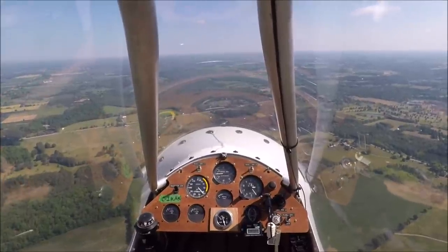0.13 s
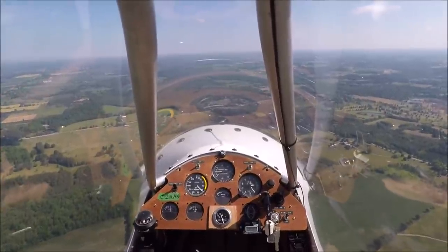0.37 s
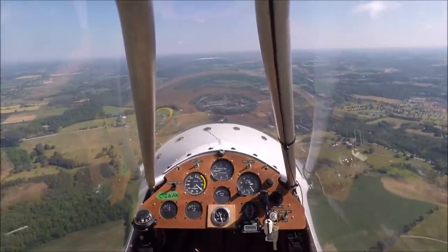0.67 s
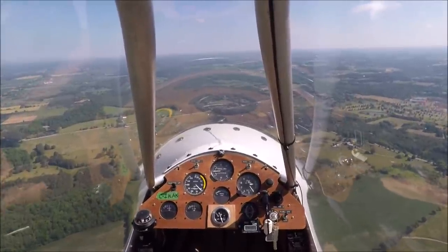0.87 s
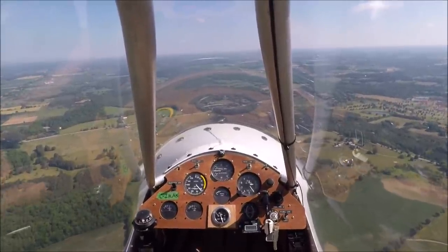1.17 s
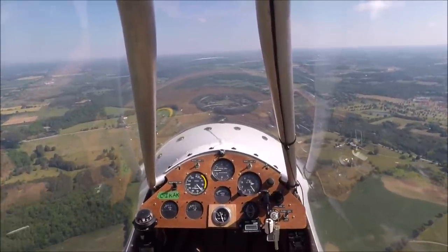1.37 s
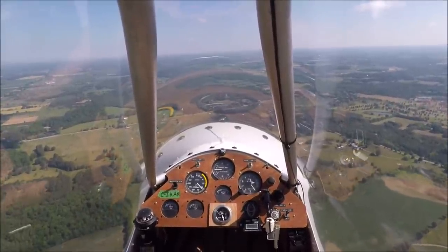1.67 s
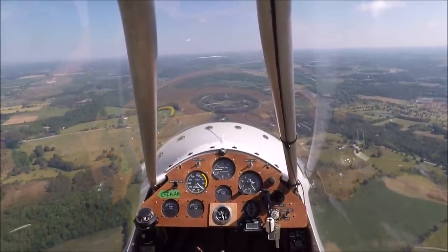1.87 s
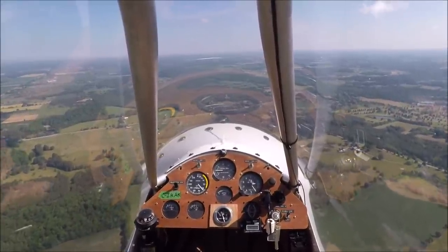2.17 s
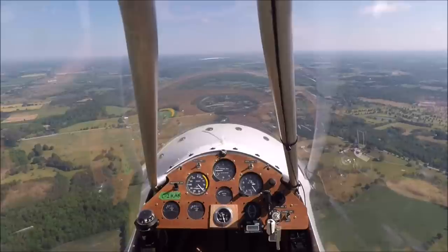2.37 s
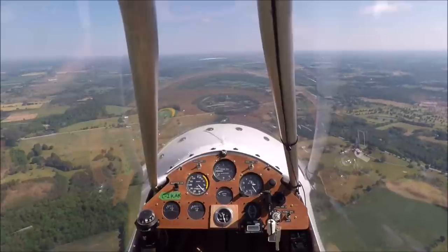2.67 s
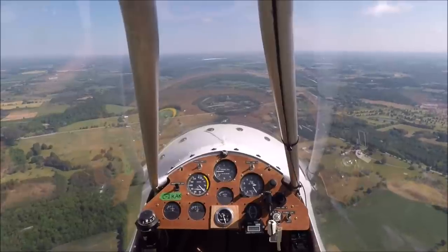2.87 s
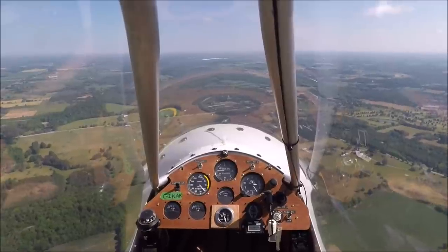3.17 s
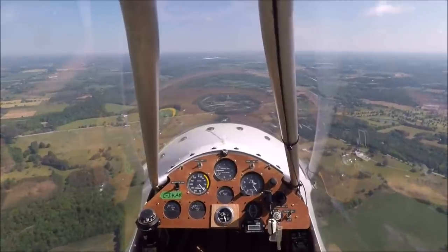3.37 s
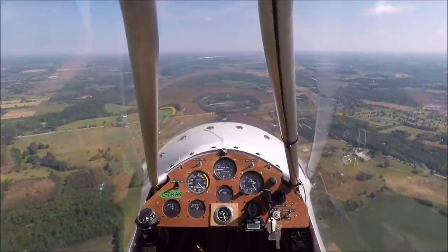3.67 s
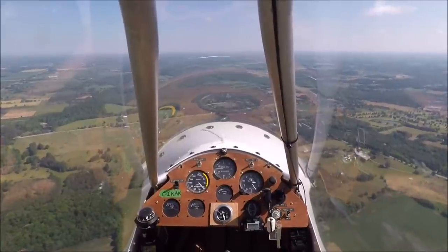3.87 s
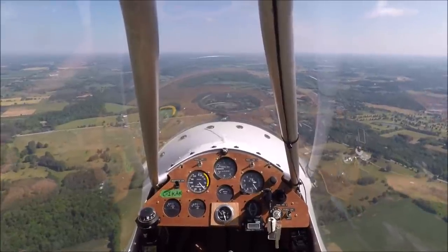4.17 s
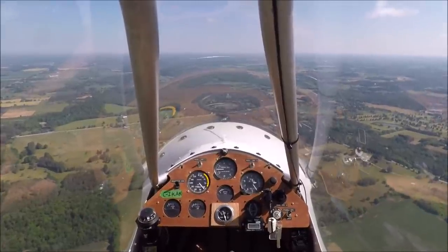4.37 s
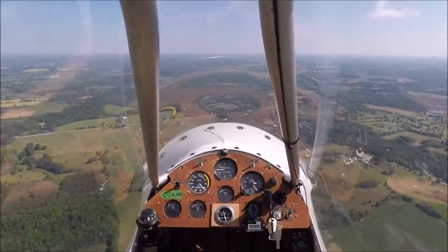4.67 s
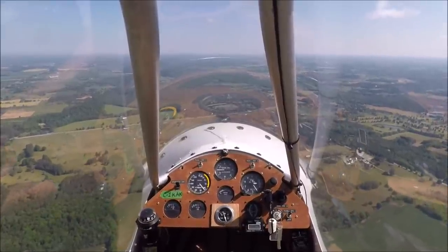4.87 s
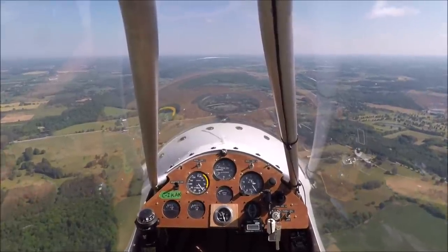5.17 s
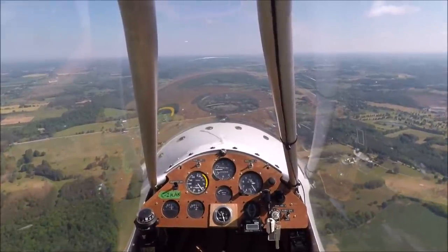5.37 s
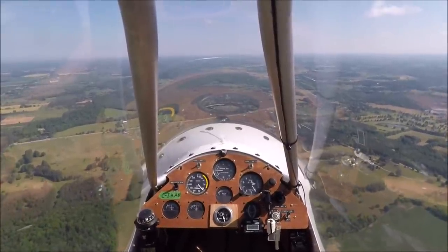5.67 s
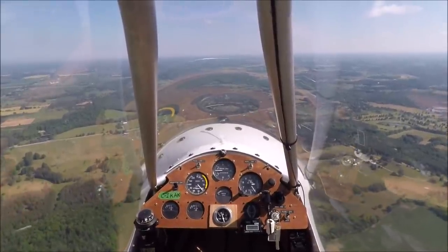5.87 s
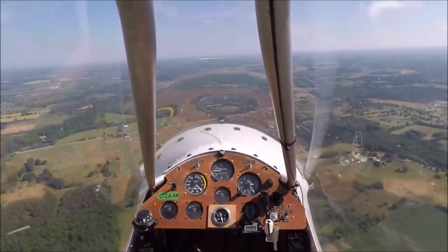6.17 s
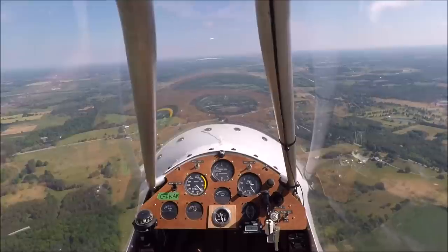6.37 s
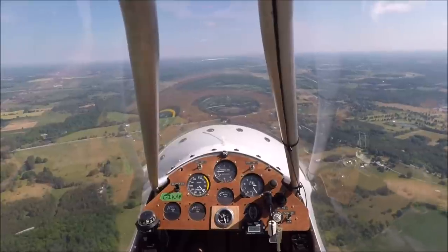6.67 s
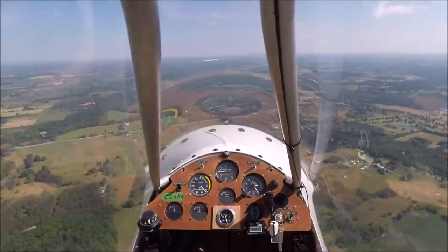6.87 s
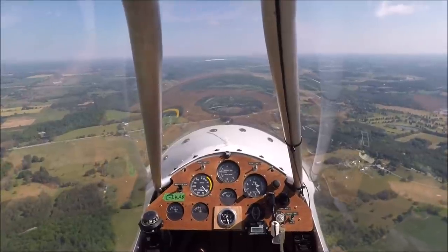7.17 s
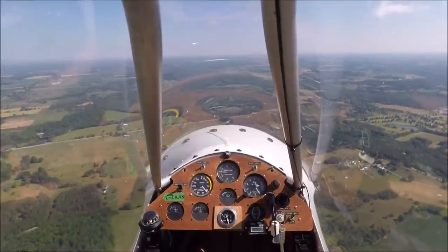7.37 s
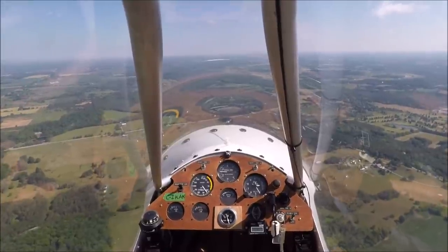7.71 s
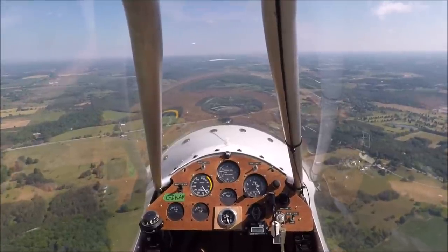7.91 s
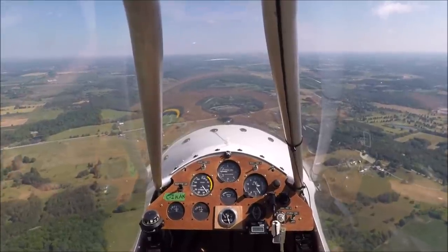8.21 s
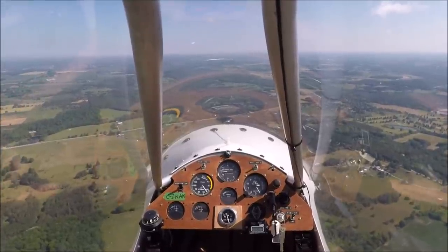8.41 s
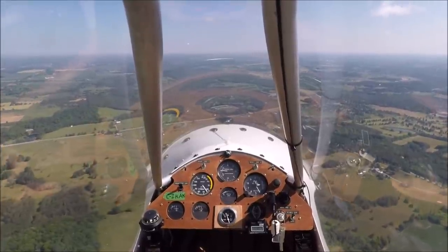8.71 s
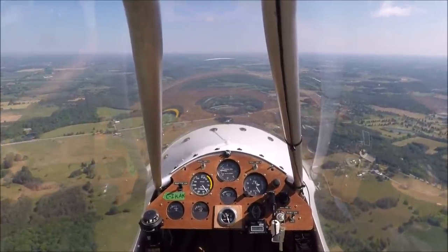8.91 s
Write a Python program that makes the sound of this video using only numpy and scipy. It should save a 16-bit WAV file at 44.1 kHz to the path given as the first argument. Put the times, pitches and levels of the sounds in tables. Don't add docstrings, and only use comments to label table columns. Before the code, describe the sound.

From 0 to about 9 seconds, a light aircraft's idle intercom line drones without a break. The main sound is a nasal, buzzing alternator whine around 565 to 570 hertz with bright overtones, dipping slightly near 0.4 seconds, then creeping up and wavering by tiny amounts. Soft, dull thumps run through it about 24 per second, nearly regular with occasional small slips, giving a fast puttering flutter. Beneath is thin, band-limited engine and propeller noise from a headset microphone, roughly 1 to 6 kilohertz, grainy and unsteady. Brief gusts lift it slightly near 1, 3, 4.6, 6.4 and 8.5 seconds; it eases around 5.8, then grows closer and rougher from about 7.7. Everything is dry and left-sided. The right side carries only faint hiss and a very weak low hum. Nobody speaks, and it ends still droning.

```python
import sys
import numpy as np
from scipy import signal
from scipy.fft import rfft, irfft, next_fast_len
from scipy.io import wavfile

SR = 44100
rng = np.random.default_rng(int(sys.argv[2]) if len(sys.argv) > 2 else 0)


def makeup_ratio(level_db):
    decades = np.asarray(level_db, float) / 20
    return 10 ** decades


def unload_wav(signal):
    wavfile.write(
        sys.argv[1],
        SR,
        np.round(np.clip(np.atleast_2d(signal).T, -1, 1) * 32767).astype(np.int16),
    )


N = 399105


def drift(rate_hz, count=1):
    step = max(int(SR / rate_hz / 8), 1)
    pole = np.exp(-2 * np.pi * rate_hz * step / SR)
    noise = rng.standard_normal((count, N // step + 52))
    slow = signal.lfilter([1], [1, -2 * pole, pole * pole], noise)[:, 50:]
    return np.array([np.interp(np.arange(N) / step, np.arange(len(s)), s / s.std()) for s in slow])


def coloured(hz_points, db_points, edges_hz=(0, SR)):
    size = next_fast_len(N, True)
    hz = np.arange(size // 2 + 1) * SR / size
    density_db = np.interp(np.log(hz + 1), np.log(hz_points), db_points)
    spectrum = rfft(rng.standard_normal(size)) * makeup_ratio(density_db) * np.sqrt(SR / 2)
    if len(edges_hz) == 2:
        return irfft(spectrum, size)[:N]
    shares = [np.interp(hz, edges_hz, share) for share in np.eye(len(edges_hz))]
    return np.array([irfft(spectrum * share, size)[:N] for share in shares])


def wave(turns):
    return np.cos((2 * np.pi * (turns - np.floor(turns))).astype(np.float32))


def wandering(turning, lines, steady, wander_hz):
    wander = drift(wander_hz, count=2 * len(lines)) * np.sqrt((1 - steady ** 2) / 2)
    out = np.zeros(N)
    for k, (multiple, peak_db) in enumerate(lines):
        turns = round(multiple) * turning + rng.random()
        in_phase = (steady + wander[2 * k]) * wave(turns)
        quadrature = wander[2 * k + 1] * wave(turns - 1 / 4)
        out += makeup_ratio(peak_db) * (in_phase + quadrature)
    return out


# start_s [s], rate_hz [Hz]
SPEED = [(0.0, 564.779), (0.401, 562.858), (0.532, 564.41), (1.5, 567.418), (2.005, 566.788),
         (2.08, 567.85), (2.147, 569.385), (3.952, 567.539), (4.191, 569.865), (5.274, 570.337),
         (5.336, 568.944), (5.984, 569.034), (6.435, 567.742), (6.998, 567.823), (7.412, 567.099),
         (7.606, 568.781), (8.354, 570.025), (9.05, 569.419)]


def ripple_cycles(t):
    return 0.449 + np.cumsum(np.interp(t, *np.transpose(SPEED))) / SR


# freq_hz [Hz], left_db [dB per Hz], right_db [dB per Hz]
HISS = [
    (11.8, -79, -84),
    (39, -94, -99),
    (142, -95.5, -100.5),
    (385, -93.5, -103.5),
    (1020, -102, -107),
    (2900, -108, -110),
    (5200, -113.5, -113.5),
    (9100, -118, -116.5),
    (9800, -116, -114),
    (14800, -118, -117),
]


def amplifier_hiss():
    hz, left_db, right_db = np.transpose(HISS)
    return np.array([coloured(hz, left_db), coloured(hz, right_db)])


def ground_hum(cycles):
    return makeup_ratio(-87) * wave(cycles / 3)


# [closeness to the noise, dB]
HEAD = [(0.0, -0.33, -0.59, 0.5), (0.4, -0.32, 0.066, 0), (0.87, 0.71, -1.7, -1), (1.4, 0.8, -0.92, 0.4),
        (2.0, 0.88, 0.13, 0), (2.4, 0.4, -0.13, 0.01), (2.91, 1, -0.28, -0.4), (3.5, 0.67, 0.19, -1.5),
        (4.1, 0.7, 0.14, 0.8), (4.6, 0.34, 1.49, 0.3), (5.2, -0.13, 1.6, 1.3), (5.8, -0.19, 0.71, -3),
        (6.3, 0.25, -0.7, -0.2), (6.9, 0.17, -0.45, -0.5), (7.45, 0.47, -0.96, 1),
        (7.7, -1.8, -0.0032, 3.1), (8.39, -0.93, 0.5, 1.15), (9.05, -1.2, 0.78, 2.6)]


def echoed(lines, ripple_share):
    s, canopy_cm, panel_cm, _ = np.transpose(HEAD)
    t = np.arange(N) / SR
    paths_cm = {"canopy": np.interp(t, s, canopy_cm), "panel": np.interp(t, s, panel_cm)}
    sound_cm_per_s = 34300
    waves_per_cm = np.mean(np.array(SPEED)[:, 1]) * ripple_share / sound_cm_per_s
    out = []
    for multiple, direct_db, echo, agree_cm, wall in lines:
        turns = round(multiple) * waves_per_cm * (paths_cm[wall] - agree_cm)
        power = 1 + echo ** 2 + 2 * echo * wave(turns)
        out.append((multiple, direct_db + 10 * np.log10(power)))
    return out


# start_s [middle of the gust, s], level_db [rise, dB], length_s [s]
GUSTS = [(1.01, 4, .05), (2.522, 2, .06), (2.77, 2, .05), (2.97, 5, 0.17), (3.172, 5, 0.055),
         (3.74, 2.5, .06), (4.58, 3, .08), (4.878, 2, 0.11), (5.334, 1, .15), (6.396, 5, .05),
         (8.11, 2, .05), (8.38, 3.5, 0.036), (8.53, 4, .07)]


def slipstream(t):
    s, *_, near_db = np.transpose(HEAD)
    gusts_db = sum(db * np.exp(-(2 * (t - at) / length) ** 2) for at, db, length in GUSTS)
    flutter_db = 0.5 * drift(rate_hz=9)[0]
    return makeup_ratio(np.interp(t, s, near_db) + gusts_db + flutter_db)


# freq_hz [Hz], level_db [dB per Hz]
LEAK_COLOUR = [(400, -106), (850, -100), (1050, -93), (1220, -80), (1350, -87), (1500, -85), (1850, -90.5),
               (2700, -92.5), (3200, -90), (4300, -95.5), (5900, -94), (7500, -102), (10500, -109),
               (12500, -122)]


def engine_noise(patchy_db=1.0, shared_db=1.06):
    bands = coloured(*np.transpose(LEAK_COLOUR), edges_hz=(600, 1200, 1800, 2800, 4200, 6000, 9000))
    patches = patchy_db * drift(rate_hz=4, count=len(bands))
    return np.sum(bands * makeup_ratio(patches + shared_db * drift(rate_hz=19)), axis=0)


# multiple [of the blade rate], level_db [peak dB]
BLADE_LINES = [(1, -73), (2, -68.5), (3, -80), (5, -90), (9, -72), (10, -78), (11, -73), (12, -71),
               (14, -67.5), (15, -65), (16, -63.5), (17, -62), (18, -70), (19, -77), (20, -62), (21, -62.5),
               (22, -71), (23, -89), (24, -68.5), (25, -72), (27, -71), (28, -69), (29, -77), (30, -68.5),
               (31, -69.5)]


def propeller(cycles):
    turning = cycles * 5 / 39
    airframe = wandering(turning, BLADE_LINES[:3], steady=0.96, wander_hz=4)
    return airframe + wandering(turning, BLADE_LINES[3:], steady=0.76, wander_hz=4)


# multiple [of a sixth of the ripple rate], level_db [peak dB]
ORDER_LINES = [(9, -77), (10, -70), (17, -68), (20, -71), (22, -76), (23, -68), (26, -66), (27, -69),
               (28, -70), (32, -66.5), (35, -70.5), (44, -72), (46, -71), (49, -76), (50, -73), (52, -68.5),
               (56, -65.5), (59, -81), (61, -73), (68, -73), (70, -72.5), (76, -75), (80, -73.5)]
# multiple [of a sixth of the ripple rate], level_db [direct peak dB],
# echo_share [0-1], agree_cm [extra path where both agree, cm], wall [name]
ORDERS_ECHOED = [
    (15, -55.5, 0.9, -10.5, "canopy"),
    (21, -54, 0.87, 8.5, "canopy"),
    (34, -55, 0.71, 5, "canopy"),
    (62, -60, 0.87, -2.5, "canopy"),
    (58, -69, .97, 1.3, "panel"),
    (63.53, -67.5, .97, -0.3, "panel"),
]


def engine_orders(cycles, jitter=0.0019):
    turning = (cycles + jitter * drift(rate_hz=50)[0]) / 6
    loose = wandering(turning, ORDER_LINES, steady=0.82, wander_hz=3)
    return loose + wandering(turning, echoed(ORDERS_ECHOED, ripple_share=1 / 6), steady=0.96, wander_hz=12)


EARLY_THUMPS = [17, 33, 36, 38, 40, 44, 45, 46, 47, 49, 155, 157, 169, 170, 171, 176]


def thumps(cycles, click_db=-5.5, low_cut_hz=35, sag_hz=70, sag_width_hz=35, sag=0.57):
    first_cycles, every_cycles = 17.45, 24
    dull_hz, smear_hz, damping, vary_db = 1000, 261, 1.2, 0.6
    gaps = np.full(int(cycles[-1] / (every_cycles - 1)), every_cycles)
    gaps[0] = 0
    gaps[EARLY_THUMPS] -= 1
    at = np.searchsorted(cycles, first_cycles + np.cumsum(gaps))
    clicks = np.zeros(N + 1)
    clicks[at] = makeup_ratio(click_db + vary_db * rng.standard_normal(len(at)))
    pulses = signal.lfilter(*signal.butter(2, dull_hz, fs=SR), clicks[:N] + 1e-18)
    w = 2 * np.pi * smear_hz
    all_pass = signal.bilinear([1, -damping * w, w * w], [1, damping * w, w * w], SR)
    smeared = signal.lfilter(*all_pass, pulses)
    sagging = signal.lfilter(*signal.iirpeak(sag_hz, sag_hz / sag_width_hz, SR), smeared)
    return signal.lfilter(*signal.butter(1, low_cut_hz, "high", fs=SR), smeared - sag * sagging)


# multiple [of the ripple rate], level_db [peak dB]
RIPPLE = [(1, -43.7), (2, -44.3), (3, -48), (5, -66), (6, -58), (8, -70), (11, -73.5), (12, -72), (13, -71),
          (14, -83), (15, -78.5), (16, -73.5), (17, -83), (18, -82), (19, -76.5), (20, -80), (22, -79.5),
          (23, -81), (25, -80), (26, -84)]
# multiple [of the ripple rate], level_db [direct peak dB],
# echo_share [0-1], agree_cm [extra path where both agree, cm], wall [name]
RIPPLE_ECHOED = [
    (4, -54.5, 0.54, 6.5, "canopy"),
    (7, -59.5, 0.3, 3.5, "canopy"),
    (9, -61.9, 0.73, -3, "panel"),
    (10, -65, .63, -1.7, "panel"),
]


def ripple(cycles, jitter=0.0045, sway_db=1.6, loose_rad=0.5):
    rise, fall, jump, settle = 0.16, 0.46, 0.55, 0.07
    turn = np.arange(512) / 512
    ramping = (turn >= rise) & (turn < fall)
    ramp = jump - (1 + jump) * (turn - rise) / (fall - rise)
    settling = -np.exp(-((turn - fall) % 1) / settle)
    lag = np.angle(rfft(np.where(ramping, ramp, settling)))
    trembling = cycles + jitter * drift(rate_hz=70)[0] - lag[1] / (2 * np.pi)
    lines = RIPPLE + echoed(RIPPLE_ECHOED, ripple_share=1)
    sways = sway_db * drift(rate_hz=3, count=len(lines))
    slips = loose_rad * drift(rate_hz=8, count=len(lines))
    out = np.zeros(N)
    for (multiple, peak_db), sway, slip in zip(lines, sways, slips):
        k = round(multiple)
        weak = min(k / 9, 1)
        phase_rad = lag[k] + weak ** 2 * slip
        out += makeup_ratio(peak_db + weak * sway) * wave(k * trembling + phase_rad / (2 * np.pi))
    return out


def scene():
    t = np.arange(N) / SR
    cycles = ripple_cycles(t)
    swell = slipstream(t)
    leak = swell * engine_noise() + np.sqrt(swell) * propeller(cycles) + engine_orders(cycles)
    left = leak + thumps(cycles) + ripple(cycles)
    return np.array([left, ground_hum(cycles)]) + amplifier_hiss()


def band_limit(x):
    return signal.sosfilt(signal.butter(12, 15270, fs=SR, output="sos"), x)


def record(dry):
    return band_limit(dry)


dry = scene()
out = record(dry)
unload_wav(out)
```